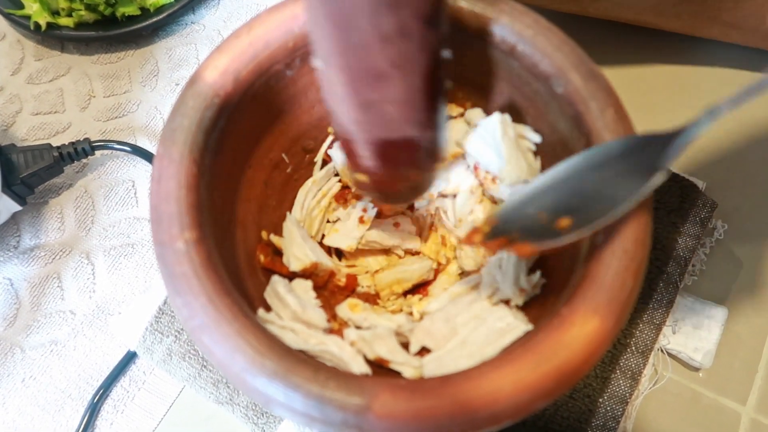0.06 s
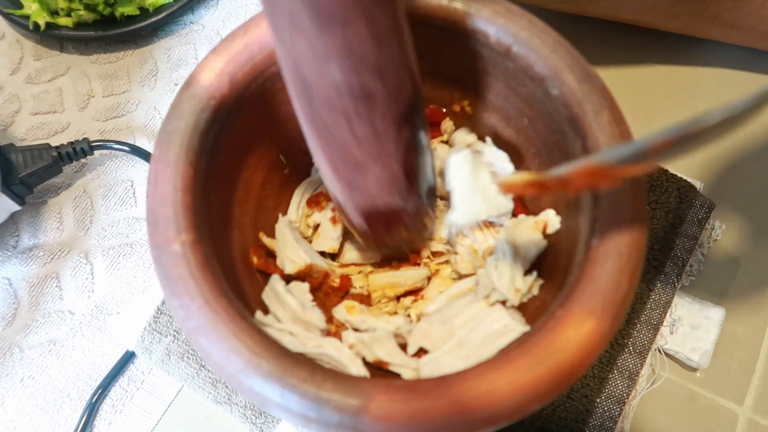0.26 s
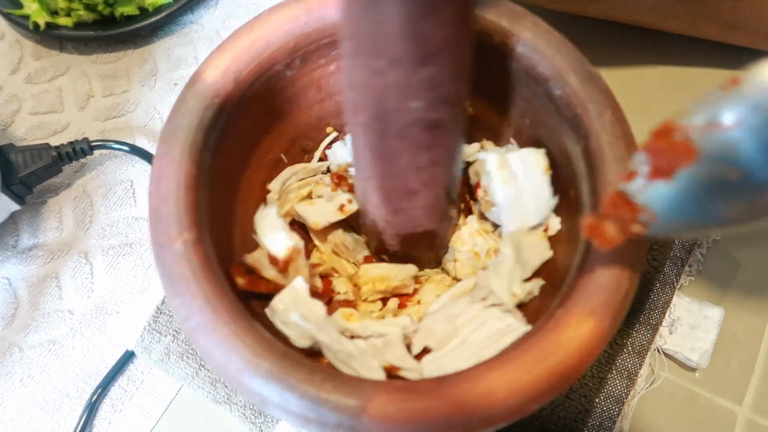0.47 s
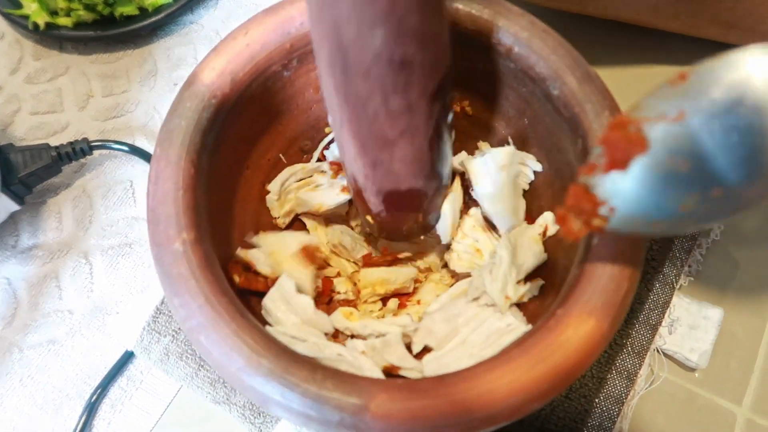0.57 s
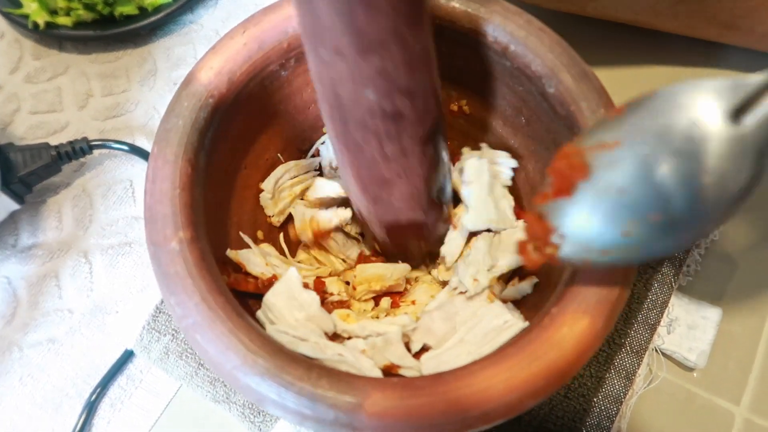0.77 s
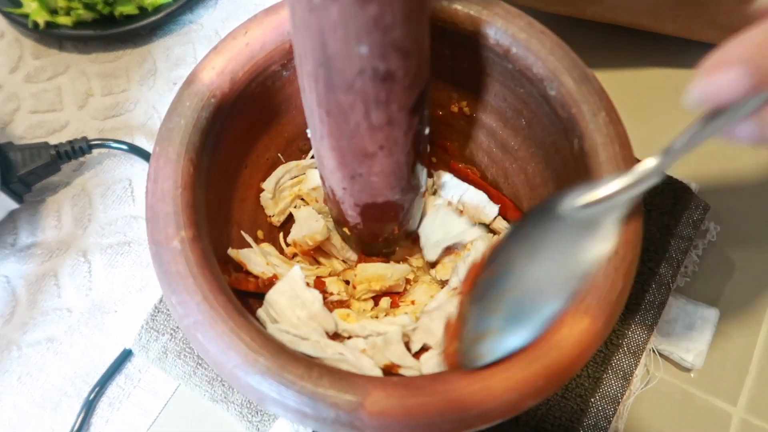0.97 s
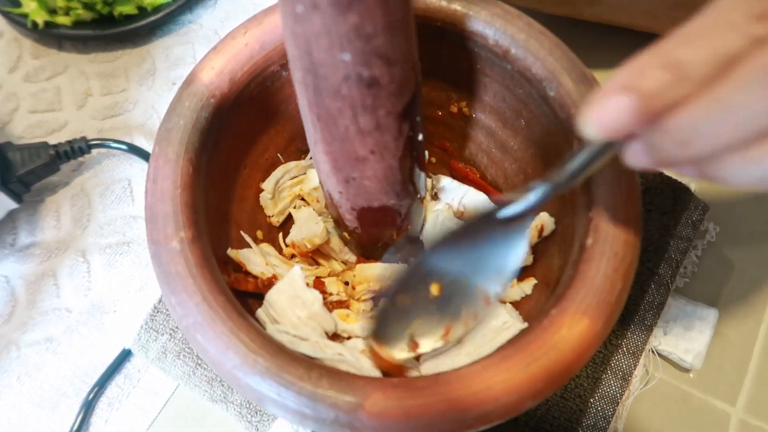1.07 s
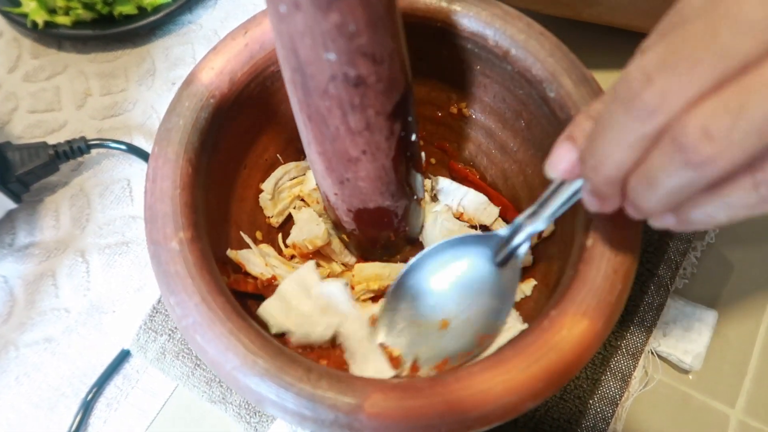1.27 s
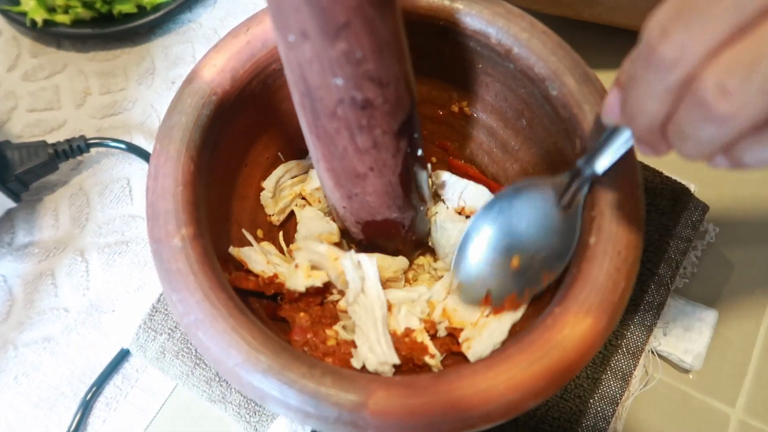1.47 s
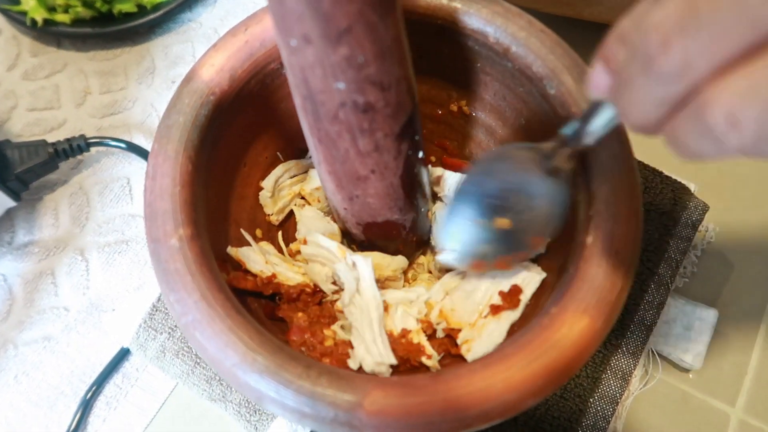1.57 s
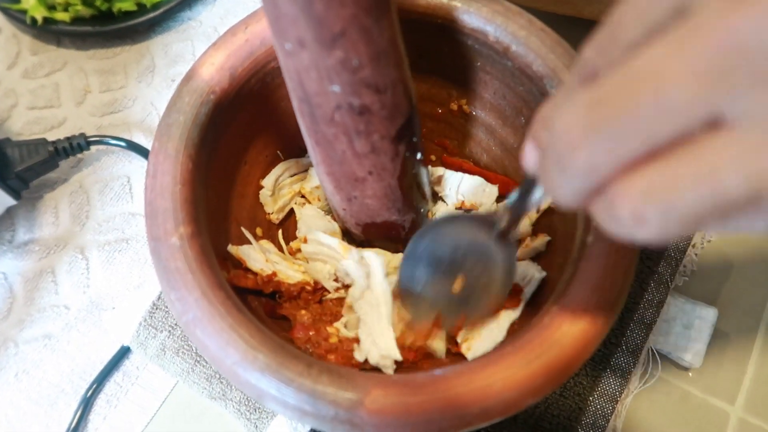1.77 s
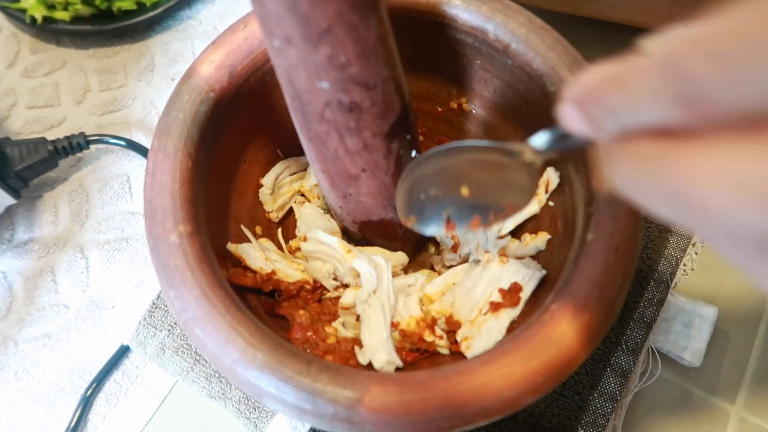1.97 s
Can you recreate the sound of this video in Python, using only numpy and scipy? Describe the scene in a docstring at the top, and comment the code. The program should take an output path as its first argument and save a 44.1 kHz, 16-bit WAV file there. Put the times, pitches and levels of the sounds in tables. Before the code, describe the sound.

Moist pestle knocks in a clay mortar, followed by a steel spoon's clink and light scraping.

```python
"""In a quiet kitchen, a pestle presses three times into wet paste and shredded food in a clay mortar.
Each push crunches, knocks on the clay and lets go with sticky clicks. The crunch is a crowd of tiny
clicks that make the clay ring briefly. A steel spoon then strikes the wall, rings, and scrapes through
the food. Both tools squeak as they stick and slip. An appliance hums behind."""
import sys
import numpy as np
from scipy import signal
from scipy.fft import rfft, irfft
from scipy.io import wavfile

SR = 44100
rng = np.random.default_rng(int(sys.argv[2]) if len(sys.argv) > 2 else 0)


def output_pcm(signal):
    """Save a mono or channel-first signal as 16-bit PCM at the path in sys.argv[1].

    Samples are clipped to [-1, 1] before scaling.
    """
    pcm = np.clip(np.atleast_2d(signal).T, -1, 1) * 32767
    wavfile.write(sys.argv[1], SR, np.round(pcm).astype(np.int16))


N = 88200

# The pestle working the paste. Each row: start in seconds, seconds until the final fade, level in dB at
# the start and at that turn, fade time in seconds (to fall 60 dB), hollow (bass) and treble boost in dB.
PESTLE_PUSHES = [(0.206, 0.024, -50.5, -41, 0.026, 3, 0), (0.222, 0.023, -41.5, -37, 0.24, 6, 4),
                 (0.257, 0.0043, -43, -33.5, 0.089, -1, 7), (0.324, 0.0041, -39, -50, 0.17, 3, -1),
                 (0.489, 0.026, -36, -24.5, 0.11, 8, 4), (0.591, 0.0089, -38, -40, 0.12, -1, -1.5),
                 (0.753, 0.017, -36, -20.5, 0.082, 3.5, -2), (0.815, 0.047, -48, -49.5, 0.048, 7, 1)]
# Knocks and sticky pops. Each row: time in seconds, then level, hollow boost and treble boost in dB.
PESTLE_KNOCKS = [(0.2612, -24, -1, 5), (0.2686, -24, 11, 4), (0.2972, -24, 3, -2), (0.3298, -28, -5, -5),
                 (0.338, -33.5, 3, 5), (0.5125, -8.5, -4, -23), (0.516, -11.5, 19, 3.5),
                 (0.598, -20.5, -26, -19.5), (0.6095, -27, -5, -9), (0.7701, -5, -5, -11),
                 (0.774, -11, 1.5, 7), (0.862, -27, -1, -10), (0.979, -37, 29.5, -14), (1.02, -44, 27, -19),
                 (1.1185, -20.5, 15.5, -6), (1.555, -26.5, 23, -7), (1.606, -35.5, 27, -13),
                 (1.364, -34, -22, 11.5), (1.747, -34.5, -1, -21)]
# The tones of the filled mortar. Each row: pitch in Hz, level in dB, fade time in seconds.
MORTAR_TONES = [(795, 6.5, 0.019), (1130, 4, 0.018), (1280, 2, 0.018), (1760, 6, 0.025), (2160, 3, 0.022),
                (2590, 4, 0.03), (2850, 3, 0.022), (3250, 2, 0.025), (3930, 4, 0.025), (5650, 2, 0.025)]
# Tiny wet ticks of the paste. Each row: time in seconds, level in dB.
PASTE_TICKS = [(0.057, -42), (0.364, -33.5), (0.4825, -14.5), (0.4878, -15), (0.65, -36), (0.707, -40),
               (0.746, -19), (0.857, -31.5), (1.353, -46.5), (1.406, -33.5), (1.509, -30.5), (1.898, -28),
               (1.908, -49)]
# The spoon hitting the wall, and the ring that swells up during the last scrape. Each row: time in seconds,
# then clack level, ring level and top boost in dB.
SPOON_STRIKES = [(1.1002, -12, -22.5, 10), (1.535, -36, -45.5, 20), (1.616, -60, -37, -26),
                 (1.926, -31.5, -66, 52)]
# The spoon chattering and dragging on the clay. Each row: start and length in seconds, level in dB,
# treble boost in dB.
SPOON_CHATTERS = [(1.101, 0.022, -28.5, 8.5), (1.113, 0.02, -36, 10)]
SPOON_SCRAPES = [(1.1, 0.031, -34.5, -11), (1.115, 0.055, -44.5, -14), (1.5345, 0.0043, -33.5, 8.5),
                 (1.54, 0.016, -38, 8), (1.545, 0.089, -43.5, 1), (1.596, 0.016, -55, 1),
                 (1.627, 0.026, -44.5, 7), (1.864, 0.088, -59, 8)]
# The spoon's tones. Each row: pitch in Hz, level in dB, fade time in seconds, twin strength from 0 to 1.
SPOON_TONES = [(1522.8, -1, 0.34, 0.91), (2110, -15, 0.16, 0.3), (2580, -18, 0.22, 0),
               (3557, -15.5, 0.2, 0), (4040, -15, 0.27, 0.67), (4276, -31, 0.091, 0.1),
               (5950, -12, 0.034, 0), (6860, -9, 0.037, 0), (8600, -41, 0.087, 0.2), (11000, -35, 0.034, 0),
               (12500, -34, 0.072, 0.2), (13100, -19, 0.018, 0.5), (13800, -45, 0.045, 0.3)]
# Wet pestle and steel squeaking on clay. Each row: start and length in seconds, pitch in Hz, level in dB.
CLAY_SQUEAKS = [(0.59, 0.014, 2563, -31.5), (1.009, 0.017, 1446, -53.5), (1.533, 0.025, 2700, -44.5),
                (1.56, 0.0078, 3330, -43), (1.59, 0.033, 3990, -43.5), (1.594, 0.017, 3340, -42),
                (1.594, 0.014, 5930, -50), (1.626, 0.016, 3150, -46), (1.926, 0.0066, 13000, -43)]
# The tone colours of four kinds of contact and of the room noise. Each row: frequency in Hz,
# relative level in dB.
PASTE_COLOUR = [(100, -13), (450, -37.5), (750, -7), (1400, -7.5), (2500, 4.5), (4000, -2), (6000, -11),
                (8500, -18.5), (14000, -21.5)]
WET_COLOUR = [(500, -40), (2500, 5), (6500, 5), (9000, -3.5), (14000, -5)]
CLACK_COLOUR = [(200, -31), (800, 2.5), (1300, -7), (2350, 16.5), (3150, -9.5), (3900, 7.5), (4600, 1),
                (6800, -14.5), (8500, -21.5), (14000, -30.5)]
SCRAPE_COLOUR = [(400, -20), (720, 4), (1100, -0.5), (1600, 11), (2400, -8), (3000, 7), (3700, -0.5),
                 (4800, -12.5), (6000, -13.5), (6900, -21.5), (8000, -11.5), (9000, -23), (10400, -11.5),
                 (11900, -24), (13300, -8.5), (15000, -32)]
ROOM_COLOUR = [(20, -10), (45, -4), (70, -4), (130, -4), (195, -4), (250, -11), (400, -12), (700, -17),
               (1500, -23.5), (2600, -26.5), (3000, -25), (3500, -30), (6000, -36), (14000, -45.5)]
# How the kitchen's echo dies away. Each row: frequency in Hz, fade time in seconds.
KITCHEN_FADE = [(300, 0.12), (1200, 0.25), (3000, 0.3), (7000, 0.37), (14000, 0.34)]
# The appliance's low hum and thin whine. Each row: pitch in Hz, average level in dB.
HUM_TONES = [(48.6, -56.5), (100, -57), (120, -63), (147.5, -52.5), (198, -50.5)]
WHINE_TONES = [(1034, -67), (1680, -69.5), (2767, -70.5), (3009, -67)]
# How alike the room noise is on the left and right. Each row: frequency in Hz, likeness from 0 to 1.
ROOM_LIKENESS = [(60, 1), (170, 0.99), (330, 0.53), (700, 0.46), (2000, 0.24), (5000, 0), (12000, 0)]

HOLLOW_HZ, TREBLE_HZ = 1230, 5000  # the boosts act below and above these
GRAINS_PER_S, GRAIN_SPREAD_DB = 3500, 5
CRUNCH_DETUNE, KNOCK_DETUNE, DETUNE_FULL_HZ = 0.11, 0.035, 3000
TICK_FADE_S, SPRAY_DB = 0.087, -3
BEAT_HZ, RING_TOP_HZ, SCRAPE_RING_DB = 10.4, 13000, -53
SQUEAK_JITTER_HZ, JITTER_RATE_HZ = 71, 490
BOWL_ECHO_DB, BRIGHT_ECHO_DB, BOWL_FADE_S, ECHO_SWAP_S = -7, 1.5, 0.018, 0.013
PESTLE_LAG_S, SPOON_LAG_S = 1.0e-5, 1.8e-5
HUM_WANDER_HZ, WHINE_WANDER_HZ, FLUTTER_DEPTH = 1.99, 3, 0.28
ROOM_NOISE_DB = -45


def pestle(pockets=6):
    """The paste crunches as the pestle sinks; each pocket of it has its own pitch. Knocks stand out."""
    out, t = np.zeros(N), np.arange(SR // 4) / SR
    for start, length, first_db, turn_db, fade_s, hollow_db, treble_db in PESTLE_PUSHES:
        ramp = gain(np.interp(t, [0, length], [first_db, turn_db]))
        grains = ramp * fade(np.maximum(t - length, 0), fade_s) * grit(len(t))
        pocket = rng.integers(0, pockets, len(t))
        for k in range(pockets):
            ring = clay_ring(hollow_db, treble_db, CRUNCH_DETUNE)
            add(out, start, signal.fftconvolve(grains * (pocket == k), ring))
    for start, db, hollow_db, treble_db in PESTLE_KNOCKS:
        knock = clay_ring(hollow_db, treble_db, KNOCK_DETUNE)
        add(out, start, gain(db) * knock / abs(knock).max())
    return out


def clay_ring(hollow_db, treble_db, detune):
    """One click in the paste rings the mortar. Its tones shift each time, the high ones most."""
    t = np.arange(SR // 16) / SR
    body = 1. * (t == 0)
    for hz, db, fade_s in MORTAR_TONES:
        hz = hz * (1 + detune * min(hz / DETUNE_FULL_HZ, 1) * rng.uniform(-1.08, 1))
        damping = np.log(1000) / fade_s
        body += gain(db) * 2 * damping / SR * fade(t, fade_s) * np.cos(2 * np.pi * hz * t)
    return unit_energy(signal.fftconvolve(body, click(PASTE_COLOUR, hollow_db, treble_db)))


def wet_paste():
    """The paste gives small wet ticks, each with a spray of finer ones."""
    out, t = np.zeros(N), np.arange(SR // 32) / SR
    tick = click(WET_COLOUR)
    for start, db in PASTE_TICKS:
        spray = gain(SPRAY_DB) * unit_energy(grit(len(t)) * fade(t, TICK_FADE_S))
        add(out, start, gain(db) * ((t == 0) + spray) / 2)
    return signal.fftconvolve(out, tick / abs(tick).max())[:N]


def spoon():
    """The spoon clacks, chatters and scrapes on the clay, and each touch makes the steel ring."""
    contact, ring = np.zeros((2, N))
    for start, clack_db, ring_db, top_db in SPOON_STRIKES:
        clack = click(CLACK_COLOUR, treble_db=top_db / 2)
        add(contact, start, gain(clack_db) * clack / abs(clack).max())
        add(ring, start, gain(ring_db) * steel_ring(top_db))
    t = np.arange(SR // 8) / SR
    for strokes, colour in (SPOON_CHATTERS, CLACK_COLOUR), (SPOON_SCRAPES, SCRAPE_COLOUR):
        for start, length, db, treble_db in strokes:
            force = gain(db) * grit(len(t)) * arch(t, length)  # grit passing under the spoon
            rasp = unit_energy(click(colour, treble_db=treble_db))
            add(contact, start, signal.fftconvolve(force, rasp))
            add(ring, start, gain(SCRAPE_RING_DB) * signal.fftconvolve(force, steel_ring(treble_db)))
    return contact, ring


def steel_ring(top_db):
    """The spoon rings freely. Tones with a close twin throb, and a glancing touch favours the top."""
    out, t = 0, np.arange(SR // 2) / SR
    for hz, db, fade_s, twin in SPOON_TONES:
        boost_db = top_db * min(hz / RING_TOP_HZ, RING_TOP_HZ / hz) ** 2
        pair = np.sin(2 * np.pi * hz * t) - twin * np.sin(2 * np.pi * (hz + BEAT_HZ) * t)
        out += gain(db + boost_db) * fade(t, fade_s) * pair
    return out


def squeaks():
    """A surface sticks and slips, making a brief rough tone."""
    out, t = np.zeros(N), np.arange(SR // 10) / SR
    for start, length, hz, db in CLAY_SQUEAKS:
        pitch = hz + SQUEAK_JITTER_HZ * wobble(len(t), JITTER_RATE_HZ)
        tone = np.sqrt(2) * np.sin(2 * np.pi * np.cumsum(pitch) / SR)
        add(out, start, gain(db) * arch(t, length) * tone)
    return out


def bowl_echoes(sound, patterns=3):
    """Adds a dense, even blur of quick echoes off the bowl and worktop."""
    out, t = sound, np.arange(SR // 8) / SR
    for k in range(patterns):
        echoes = rng.standard_normal((3, len(t))) * (rng.random((3, len(t))) < .1)
        echoes *= (t > .0006) * fade(t, BOWL_FADE_S)
        echoes /= np.linalg.norm(echoes, axis=1, keepdims=True)
        # Both sides share one set of echoes, and each side has a bright set of its own.
        bright = signal.lfilter(*signal.butter(2, 5000, "high", fs=SR), echoes[1:])
        pattern = gain(BOWL_ECHO_DB) * echoes[0] + gain(BRIGHT_ECHO_DB) * bright
        turn = (np.arange(N) / SR / ECHO_SWAP_S + k) % patterns
        share = np.sin(np.pi / 2 * np.minimum(turn, 2))  # the patterns fade in and out by turns
        out = out + signal.fftconvolve(sound * share, pattern, axes=1)[:, :N]
    return out


def kitchen_echo(sound, echo_db):
    """Adds the room's short echo, whose low notes die first."""
    t = np.arange(SR // 2) / SR
    noise = rng.standard_normal((2, len(t))) * (t > .005)
    hz, times, spectrum = signal.stft(noise, SR, nperseg=256)
    tail = signal.istft(spectrum * fade(times, look_up(KITCHEN_FADE, hz)[:, None]), SR, nperseg=256)[1]
    tail /= np.linalg.norm(tail[0])
    return sound + gain(echo_db) * signal.fftconvolve(sound, tail, axes=1)[:, :N]


def appliance():
    """An appliance hums and whines, each tone wavering in pitch and loudness."""
    out, t = np.zeros(N), np.arange(N) / SR
    for tones, wander_hz in (HUM_TONES, HUM_WANDER_HZ), (WHINE_TONES, WHINE_WANDER_HZ):
        for hz, db in tones:
            drift = wander_hz * np.cumsum(wobble(N, rate_hz=5)) / SR
            flutter = 1 + FLUTTER_DEPTH * wobble(N, rate_hz=5)
            out += gain(db) * unit_level(flutter * np.sin(2 * np.pi * (hz * t + drift)))
    return out


def room_noise():
    """A steady rumble, alike on both sides, lies under a faint, wide hiss."""
    hz = np.fft.rfftfreq(N, 1 / SR)
    likeness = look_up(ROOM_LIKENESS, hz)
    shared, side = rfft(rng.standard_normal((2, N))) * np.sqrt([1 + likeness, 1 - likeness])
    spectrum = np.array([shared + side, shared - side]) * gain(look_up(ROOM_COLOUR, hz))
    return gain(ROOM_NOISE_DB) * unit_level(irfft(spectrum, N))


def click(colour, hollow_db=0, treble_db=0):
    """One sharp click of the given colour, with its bass and treble turned up or down."""
    hz = abs(np.fft.fftfreq(2048, 1 / SR))
    bass = 1 / (1 + (hz / HOLLOW_HZ) ** 4)
    treble = 1 - 1 / (1 + (hz / TREBLE_HZ) ** 4)
    log_gain = np.log(gain(look_up(colour, hz) + hollow_db * bass + treble_db * treble))
    spectrum = np.exp(np.conj(signal.hilbert(log_gain)))  # packs the energy at the start
    return np.fft.ifft(spectrum).real[:len(hz) // 2]


def grit(size):
    """Scattered tiny clicks of uneven strength."""
    chance, strength, sign = rng.random((3, size))
    grain_db = GRAIN_SPREAD_DB * np.minimum(-np.log(strength), 3)
    return unit_level((chance < GRAINS_PER_S / SR) * np.sign(sign - .5) * gain(grain_db))


def wobble(size, rate_hz):
    """A smooth random wavering, mostly slower than rate_hz."""
    smooth = np.exp(-(np.fft.rfftfreq(size, 1 / SR) / rate_hz) ** 2)
    return unit_level(irfft(rfft(rng.standard_normal(size)) * smooth))


def stereo(sound, lag_s):
    """The sound reaches the left side slightly later than the right."""
    delay = np.exp(-1j * np.pi * np.fft.rfftfreq(N, 1 / SR) * lag_s)
    return irfft(rfft(sound) * np.array([delay, 1 / delay]), N)


def arch(t, length):
    """The rise and fall of one stroke."""
    return np.sqrt(abs(np.sin(np.pi * np.minimum(t / length, 1))))


def fade(t, fade_s):
    """Falls by 60 dB every fade_s seconds."""
    return np.exp(-np.log(1000) * t / fade_s)


def gain(db):
    """Turns decibels into a multiplier."""
    return 10 ** (np.asarray(db) / 20)


def unit_level(x):
    """Scales the average level (rms) to 1."""
    return x / np.sqrt(np.mean(x ** 2) + 1e-20)


def unit_energy(x):
    """Scales the total energy to 1."""
    return x / np.linalg.norm(x)


def look_up(table, hz):
    """Reads between a table's rows, with octaves evenly spaced."""
    row_hz, values = np.transpose(table)
    return np.interp(np.log(hz + 1), np.log(row_hz), values)


def add(mix, start, sound):
    """Mixes a sound in at a start time in seconds."""
    part = mix[round(start * SR):][:len(sound)]
    part += sound[:len(part)]


def scene():
    """The contacts sound inside the bowl; the ring and squeaks sit above it, nearer and with less echo."""
    contact, ring = spoon()
    inside = bowl_echoes(stereo(pestle() + wet_paste(), PESTLE_LAG_S) + stereo(contact, SPOON_LAG_S))
    inside = kitchen_echo(inside, echo_db=-15)
    above = kitchen_echo(stereo(ring + squeaks(), SPOON_LAG_S), echo_db=-16.5)
    return inside + above + room_noise() + appliance()


def record(dry):
    """Cuts the highest treble, above 14750 Hz."""
    low_pass = signal.firwin(255, 14750, window=("kaiser", 9), fs=SR)
    return signal.oaconvolve(dry, low_pass[None], "same")


dry = scene()
out = record(dry)
output_pcm(out)
```